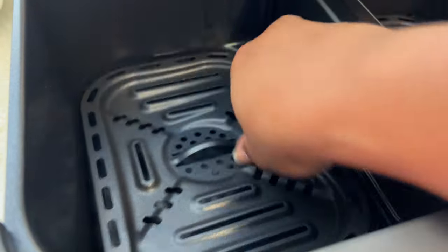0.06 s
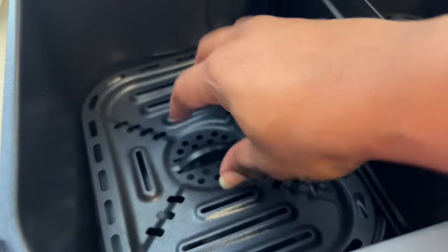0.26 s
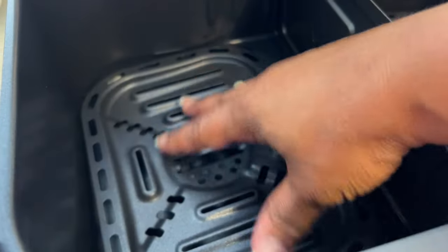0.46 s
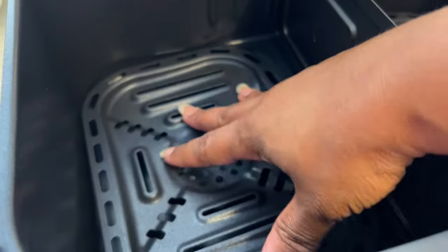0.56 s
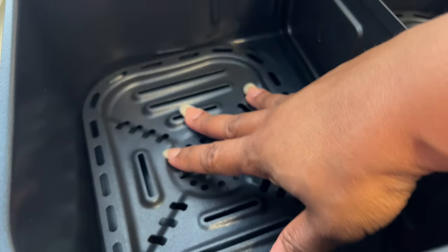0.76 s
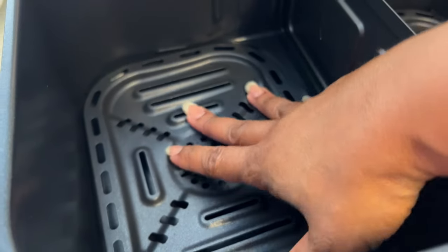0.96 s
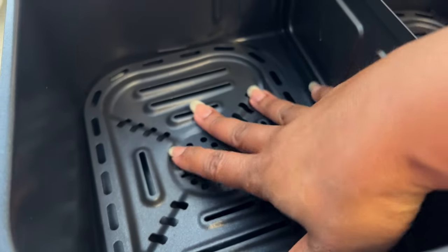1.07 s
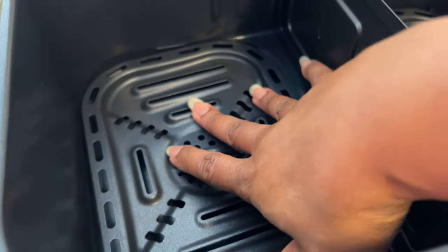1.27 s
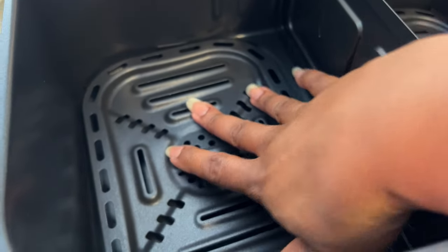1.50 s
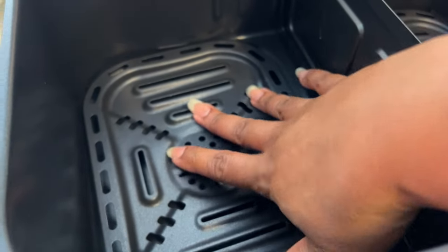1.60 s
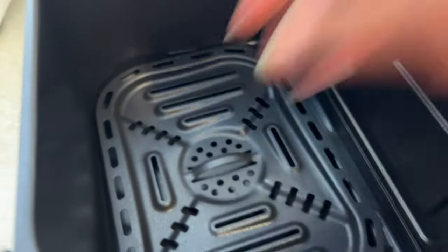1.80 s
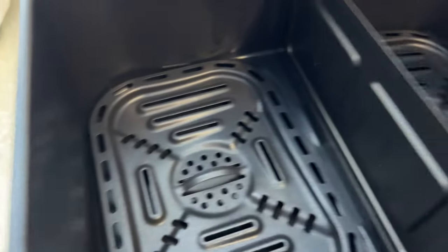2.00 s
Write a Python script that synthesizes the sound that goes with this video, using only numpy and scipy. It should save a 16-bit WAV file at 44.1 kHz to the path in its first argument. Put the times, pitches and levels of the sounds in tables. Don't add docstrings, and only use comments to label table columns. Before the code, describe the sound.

A thin perforated plate knocks dully into a plastic basket, then clinks, rubs and snaps softly

```python
import sys
import numpy as np
from scipy import signal
from scipy.fft import rfft, irfft, next_fast_len
from scipy.io import wavfile
from scipy.ndimage import uniform_filter1d

SR = 44100
rng = np.random.default_rng(int(sys.argv[2]) if len(sys.argv) > 2 else 0)


def unload_wav(signal):
    wavfile.write(
        sys.argv[1],
        SR,
        np.round(np.clip(np.atleast_2d(signal).T, -1, 1) * 32767).astype(np.int16),
    )


def decibels_to_gain(level_db):
    exponent = np.asarray(level_db, float) / 20
    return 10 ** exponent


N = 90228


def evened(x):
    return x / np.sqrt(np.mean(x ** 2) + 1e-20)


def read(points, hz):
    f, value = np.transpose(points)
    return np.interp(np.log(hz + 1), np.log(f + 1), value)


def add(mix, start_s, sound):
    part = mix[max(round(start_s * SR), 0):][:len(sound)]
    part += sound[:len(part)]


def shaped(x, gain):
    size = next_fast_len(x.shape[-1] + 2048)
    spectrum = rfft(x, size) * gain(np.fft.rfftfreq(size, 1 / SR))
    return irfft(spectrum, size)[..., :x.shape[-1]]


def coloured(x, colour, tilt_db, centre_hz):
    return shaped(x, lambda hz: decibels_to_gain(read(colour, hz) + tilt_db * np.log2((hz + 20) / centre_hz)))


def ring(modes, tilt_db=0, lag_cycles=0, scatter_db=0, count=1, centre_hz=4000, free=1):
    t = np.arange(SR // 2) / SR
    hz, level_db, t60_s = np.transpose(modes)[:, :, None]
    level_db = level_db + tilt_db * np.log2(hz / centre_hz) + scatter_db * rng.standard_normal(hz.shape)
    sign = (-1.) ** (np.arange(len(modes)) // count)
    decay = decibels_to_gain(level_db - 60 * t / (free * t60_s))
    swell = 1 - np.exp(-t * hz / (lag_cycles + 0.021))
    return sign @ (decay * swell * np.sin(2 * np.pi * hz * t))


def blows(rows, modes, width_s, lag_cycles, count):
    out = np.zeros(N)
    push = np.hanning(round(width_s * SR) + 3)
    for start_s, level_db, tilt_db, free in rows:
        body = ring(modes, tilt_db, lag_cycles, count=count, centre_hz=297, free=free)
        add(out, start_s, decibels_to_gain(level_db) * signal.fftconvolve(body, push / push.sum()))
    return out


def strokes(rows, drive, colour, centre_hz, t60_s, tail_db, tail_t60_s):
    out, t = np.zeros(N), np.arange(N) / SR
    for start_s, rise_s, hold_s, level_db, tilt_db in rows:
        a = max(round((start_s - .05) * SR), 0)
        u = t[a:a + SR // 2] - start_s
        after = np.maximum(u - rise_s - hold_s, 0)
        fall = decibels_to_gain(-60 * after / t60_s) + decibels_to_gain(tail_db - 60 * after / tail_t60_s)
        shape = np.clip(u / rise_s, 0, 1) ** 2 * fall
        tone = coloured(drive[a:a + SR // 2], colour, tilt_db, centre_hz)
        out[a:a + SR // 2] += decibels_to_gain(level_db) * shape * evened(tone)
    return out


# mode_hz, level_db, t60_s
BASKET_MODES = [(66, 0.5, 0.33), (99, 7, 0.23), (120.2, 5, 0.23), (154.2, 1.5, 0.16), (204, 8.5, 0.11),
                (223.4, 1.5, 0.63), (263, 0, 0.16), (303.3, -1.5, 0.31), (348, -9, 0.23), (399.7, -8, 0.53),
                (542, -16.5, 0.5)]
# start_s, level_db, tilt_db_per_octave, share_of_free_ring_time
LANDINGS = [
    (.0575, -26.5, -1.5, 0.93),
    (.0635, -19, 2.5, 0.44),
    (.0715, -28, 3.5, 0.43),
    (.0765, -33.5, 0, 0.74),
]


def knock():
    return blows(LANDINGS, BASKET_MODES, width_s=0.0015, lag_cycles=0.43, count=2)


# mode_hz, level_db, t60_s
FLEX_MODES = [(277.7, 9, .15), (293, 3.5, 0.433), (363.5, 7.5, 0.072), (436, -1.5, 0.214), (531, -10, 0.14),
              (746, -31, 0.37), (805, -27.5, 0.21)]
# start_s, level_db, tilt_db_per_octave, share_of_free_ring_time
PLATE_SNAPS = [
    (.611, -62.5, -19, 0.44),
    (.888, -40.5, 12.5, 0.28),
    (.926, -50, 15, 0.51),
    (.985, -54, 15.5, 0.87),
    (.998, -60, 13, 0.64),
    (1.39, -62, -3, 0.76),
    (1.41, -63, -3, 0.49),
    (2.011, -31, 3.5, 0.92),
]


def snaps():
    return blows(PLATE_SNAPS, FLEX_MODES, width_s=0.0014, lag_cycles=0.497, count=1)


# mode_hz, level_db, t60_s
PLATE_MODES = [(700, -14, .06), (2044, -12, .1), (2789, -10, .35), (3151, -10, .15), (3282, -7, .13),
               (3576, -10, .14), (3711, -6, .42), (4005, -8, .09), (4683, -4, .16), (5371, -6, .12),
               (6180, -5, .08), (7090, -3, .05), (7542, -10, .08), (9051, -7, .22)]
# start_s, level_db, tilt_db_per_octave, share_of_free_ring_time
EDGE_TAPS = [(.316, -62, -0.5, .15), (0.355, -45, -2, 0.97), (.3685, -42.5, -1.5, 0.88),
             (.372, -54.5, -5, 0.39), (.3755, -48.5, -3, 0.88), (0.4, -47.5, 13.5, 1.26),
             (0.4057, -41.5, 5.5, 0.91), (.408, -38.5, 5, 1.14), (0.41, -42.5, -5.5, 0.65),
             (.416, -50, 1.5, 0.66), (.485, -53, 4.5, 0.57), (.877, -77, 14, 0.34), (.888, -50, -2.5, .25)]
# start_s, # level_db, pitch_hz, t60_s
SINGLE_TONES = [(.357, -44, 8870, .07), (.37, -46, 2046, .09), (.37, -45, 3284, .15), (.37, -47, 2676, .1),
                (.41, -55, 2789, .45), (.41, -60, 2850, .4), (.408, -46, 6700, .05), (.412, -50, 4527, .18),
                (.41, -50, 700, .09), (.48, -58, 2740, .15), (.48, -55, 1700, .08), (.745, -46, 4450, .07),
                (.755, -52, 5371, .11), (.888, -46, 1040, .08), (.8975, -34, 300, .03),
                (.9047, -25, 285, .045), (.925, -58, 1080, .1), (.987, -50, 1030, .055),
                (1.39, -60, 2050, .07), (1.395, -64, 4250, .06), (.575, -62, 4700, .08),
                (1.657, -59, 3152, .24), (1.76, -69, 3152, .55), (2.036, -52, 3120, .1)]
# pitch_hz, level_db
CONTACT_COLOUR = [(300, -40), (700, -10), (2000, -11), (9300, -2), (10500, -19), (12200, -11), (13900, -21),
                  (15500, -10), (16300, -45)]
CATCH_S, CATCH_T60_S = .483, 0.042
CRACK_DB, CRACK_T60_S = 9, .018


def clinks():
    out, t = np.zeros(N), np.arange(SR // 20) / SR
    for start_s, level_db, tilt_db, free in EDGE_TAPS:
        held = np.maximum(np.arange(SR // 2) / SR + start_s - CATCH_S, 0) * (start_s < CATCH_S)
        caught = decibels_to_gain(level_db - 60 * held / CATCH_T60_S)
        add(out, start_s, caught * ring(PLATE_MODES, tilt_db, scatter_db=2, free=free))
        crack = rng.standard_normal(len(t)) * decibels_to_gain(level_db + CRACK_DB - 60 * t / CRACK_T60_S)
        add(out, start_s, coloured(crack, CONTACT_COLOUR, tilt_db, 4000))
    for start_s, level_db, pitch_hz, t60_s in SINGLE_TONES:
        add(out, start_s, ring([(pitch_hz, level_db, t60_s)], lag_cycles=0.89))
    return out


# start_s, rise_s, hold_s, level_db, tilt_db_per_octave
RUB_STROKES = [(0, 0.0011, 0.072, -49.5, -0.5), (.0555, .002, 0.015, -41, -5.5),
               (.08, 0.012, 0.036, -52.5, 1.5), (.315, 0.00031, 0.016, -51.5, 0.5),
               (.355, 0.0057, 0.022, -40, 1.5), (.396, 0.0067, 0.012, -40, 0), (.43, 0.0039, 0.043, -67, 1),
               (.475, 0.0054, 0.013, -50, -2), (.57, 0.0085, .015, -66, -1),
               (.611, 0.0011, 0.0092, -60, -5), (.63, 0.013, 0.091, -71, -4.5),
               (.74, 0.0036, 0.015, -50, 4), (.85, .032, 0.0029, -45.5, 6), (.887, 0.00081, 0.016, -49, -5),
               (.91, 0.0072, 0.019, -58.5, -3), (.96, 0.065, 0.028, -58, 0.5),
               (1.1, 0.034, 0.079, -76, -0.5), (1.36, 0.027, 0.019, -59.5, -7), (1.4, 0.034, 0.065, -70, 2),
               (1.5, 0.0077, 0.037, -66.5, -1.5), (1.6, 0.025, 0.048, -56, 3),
               (1.68, 0.028, 0.048, -60.5, 3), (1.73, 0.017, 0.014, -62.5, -1),
               (1.77, 0.0054, 0.02, -90, 7), (1.94, 0.058, 0.063, -66.5, -3.5),
               (2.01, 0.015, 0.015, -51.5, 0), (.13, 0.031, 0.15, -69.5, -3), (.76, 0.055, 0.14, -77, -6),
               (.975, 0.0097, 0.017, -57, -8), (1.35, 0.032, 0.018, -63, -12)]
GRIT_PER_S, GRIT_DB = 5000, 3.2
RUB_RING_DB = -2.5


def rubs():
    hiss = rng.standard_normal(N)
    grain_size = decibels_to_gain(GRIT_DB * np.minimum(rng.exponential(1, N), 4))
    grit = hiss * (0.13 + grain_size * (rng.random(N) < GRIT_PER_S / SR))
    out = 0
    for patch, (a, b, c) in enumerate(rng.random((4, 3, 50))):
        modes = np.transpose([600 + 15400 * a ** 1.3, 8 * b, 0.026 + 0.061 * c])  # Hz, dB, t60 s
        rung = signal.fftconvolve(grit, ring(modes))[:N]
        drive = evened(np.roll(grit, patch * SR // 4)) + decibels_to_gain(RUB_RING_DB) * evened(rung)
        out = out + strokes(RUB_STROKES[patch::4], drive, CONTACT_COLOUR, 4000,
                            t60_s=0.047, tail_db=-12, tail_t60_s=.4)
    return out


# start_s, rise_s, hold_s, level_db, tilt_db_per_octave
WEIGHT_SHIFTS = [(0, 0.0025, 0.014, -41.5, 8), (.1, 0.0033, 0.065, -29, -3.5),
                 (.24, 0.033, 0.07, -45.5, -2), (.35, 0.04, 0.089, -41.5, -4), (.5, 0.014, 0.1, -56, -2.5),
                 (.61, 0.022, 0.13, -59, 2.5), (.76, 0.049, 0.13, -56, 0), (.915, 0.0044, 0.05, -56, 10.5),
                 (.975, 0.022, 0.014, -47, 2), (1.28, 0.012, 0.062, -61, 2.5),
                 (1.34, 0.065, 0.015, -43.5, 1.5), (1.45, .01, 0.024, -64, -0.5),
                 (1.5, 0.026, 0.021, -60.5, 2.5), (1.6, 0.02, 0.012, -60.5, -3.5),
                 (1.72, 0.016, 0.044, -59.5, 8.5), (1.8, 0.012, 0.0084, -68.5, 6)]
# pitch_hz, level_db
THUD_COLOUR = [(15, -45.5), (25, -9), (107, 4.5), (146, 2.5), (228, -3), (408, -9.5), (659, -30.5),
               (1050, -23), (1500, -58), (1950, -86.5), (3300, -120)]
THUD_RING_DB = 3


def thuds():
    push = rng.standard_normal(N)
    damped = [(hz, 0, t60_s * 0.4) for hz, level_db, t60_s in BASKET_MODES]
    rung = signal.fftconvolve(push, ring(damped))[:N]
    low = shaped(push, lambda hz: 1 / (1 + (hz / 1800) ** 4))
    drive = evened(low) + decibels_to_gain(THUD_RING_DB) * evened(rung)
    return strokes(WEIGHT_SHIFTS, drive, THUD_COLOUR, 150, t60_s=0.25, tail_db=-44.5, tail_t60_s=0.66)


# pitch_hz, level_db
ROOM_COLOUR = [(25, -10.5), (55, 12.5), (85, 7), (540, -17), (1060, -27.5), (1800, -9.5), (2700, -21),
               (9000, -36)]
ROOM_DB = -66.5


def kitchen():
    hz, _, z = signal.stft(rng.standard_normal(N), SR, nperseg=1024)
    patches = uniform_filter1d(rng.standard_normal(z.shape), 10, 0)
    patches = evened(uniform_filter1d(patches, 6, 1))
    z = z * decibels_to_gain(read(ROOM_COLOUR, hz)[:, None] + 0.99 * patches)
    return decibels_to_gain(ROOM_DB) * evened(signal.istft(z, nperseg=1024)[1][:N])


def scattered(x, t60_s):
    taps = rng.standard_normal(SR // 2) * decibels_to_gain(-60 * np.arange(SR // 2) / SR / t60_s)
    return signal.fftconvolve(x, taps / np.linalg.norm(taps))[:N]


# pitch_hz, side_minus_mid_db
SIDE_LEVEL = [(60, -20), (150, -15), (380, -14), (950, -7), (2380, 2.5), (5980, -5), (15000, 3.5)]
# pitch_hz, in_phase_side_gain
SIDE_LEAN = [(60, -0.039), (150, -0.077), (500, -.05), (1200, -.15), (3000, 0.03)]
# pitch_hz, share
SIDE_DIFFUSE = [(100, .3), (700, .6), (2000, .85), (5000, .8), (10000, .45)]


def stereo(mid):
    def share(hz):
        return np.clip(read(SIDE_DIFFUSE, hz), 0, 1)

    def turned(hz):
        return read(SIDE_LEAN, hz) - 1j * decibels_to_gain(read(SIDE_LEVEL, hz)) * np.sqrt(1 - share(hz) ** 2)

    side = shaped(mid, turned)
    side = side + shaped(scattered(mid, t60_s=.12), lambda hz: decibels_to_gain(read(SIDE_LEVEL, hz)) * share(hz))
    return np.array([mid + side, mid - side])


def scene():
    bright = rubs() + clinks()
    mid = knock() + snaps()
    mid = mid + bright + decibels_to_gain(-11) * scattered(bright, t60_s=.26) + thuds() + kitchen()
    return stereo(mid)


SHUT_HZ = 9900
SHUT_BELOW_DB, SHUT_FLOOR_DB = -8.5, -108
SHUT_PATCH_DB = 4


def top_cut(x):
    return signal.sosfilt(signal.butter(12, 17030, fs=SR, output="sos"), x)


def record(dry):
    x = signal.sosfilt(signal.butter(4, 45, "high", fs=SR, output="sos"), dry)
    hz, _, z = signal.stft(x, SR, nperseg=1024)
    power = (abs(z[:, :512]) ** 2).mean(0).reshape(32, 16, -1).mean(1)
    level_db = 10 * np.log10(uniform_filter1d(power, size=3, axis=1) + 1e-20)
    limit_db = np.maximum(level_db[6:14].mean(0) + SHUT_BELOW_DB, SHUT_FLOOR_DB)
    wander = evened(uniform_filter1d(rng.standard_normal(power.shape), size=5, axis=1))
    weak = level_db < limit_db + SHUT_PATCH_DB * wander
    shut = np.repeat(weak, repeats=16, axis=0) & (hz[:512, None] > SHUT_HZ)
    z[:, :512] *= ~shut
    mix = signal.istft(z, nperseg=1024)[1][:, :N]
    return top_cut(mix)


dry = scene()
out = record(dry)
unload_wav(out)
```